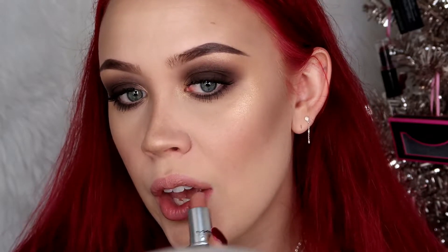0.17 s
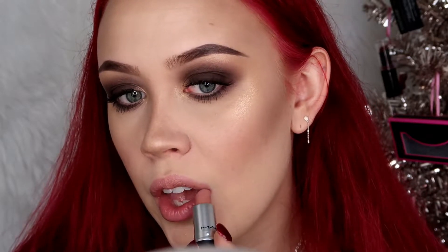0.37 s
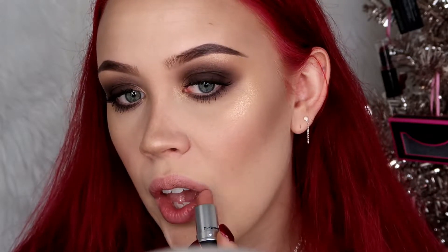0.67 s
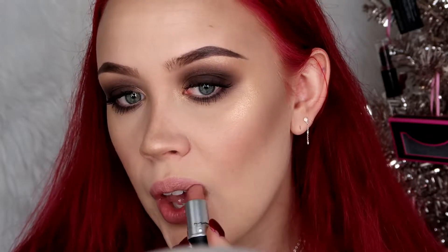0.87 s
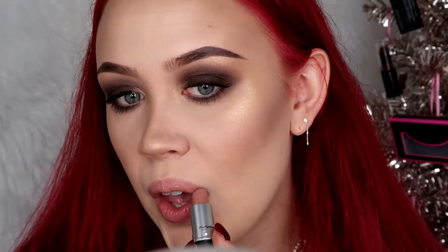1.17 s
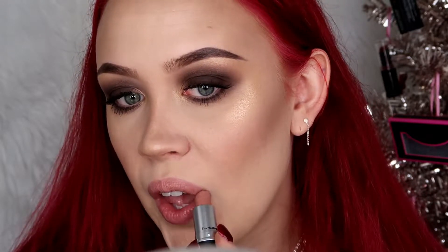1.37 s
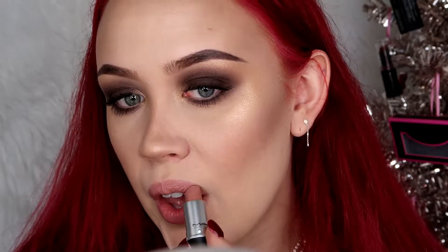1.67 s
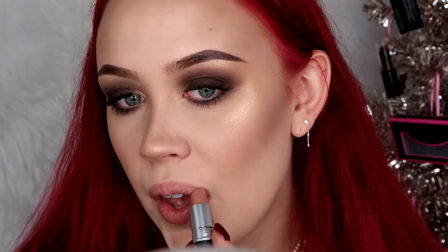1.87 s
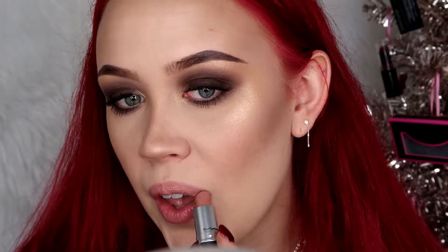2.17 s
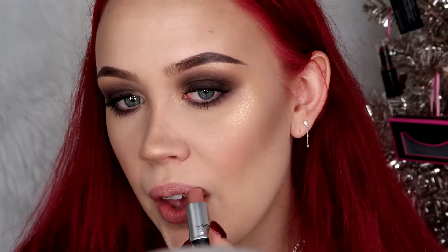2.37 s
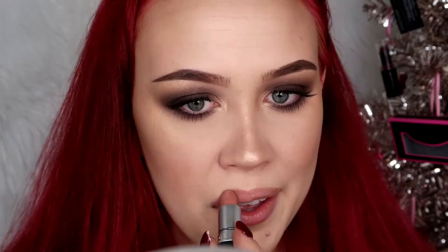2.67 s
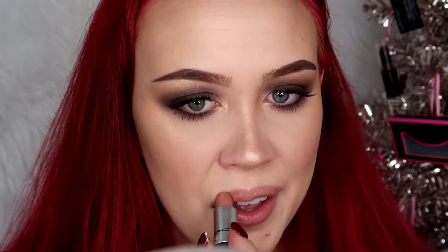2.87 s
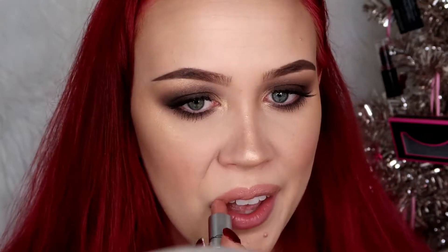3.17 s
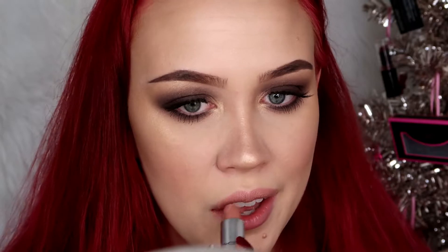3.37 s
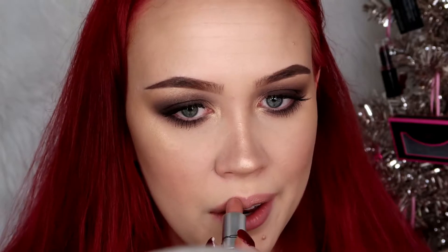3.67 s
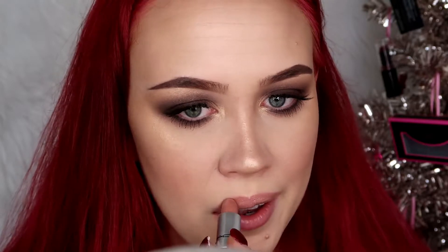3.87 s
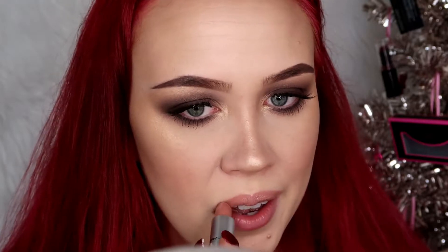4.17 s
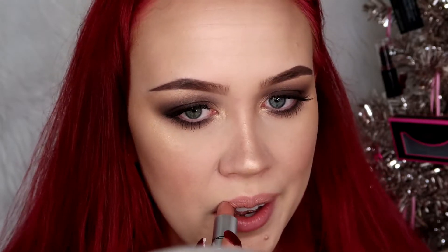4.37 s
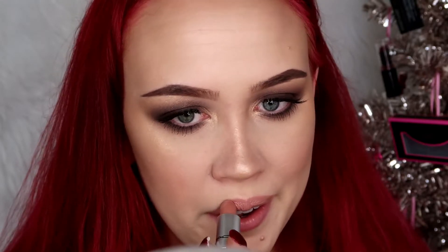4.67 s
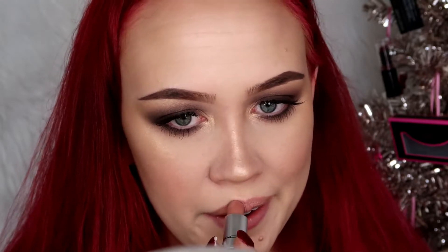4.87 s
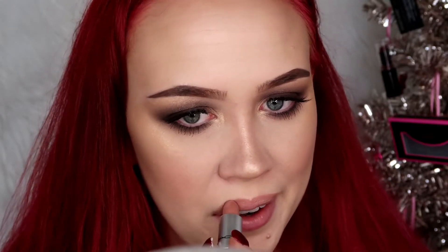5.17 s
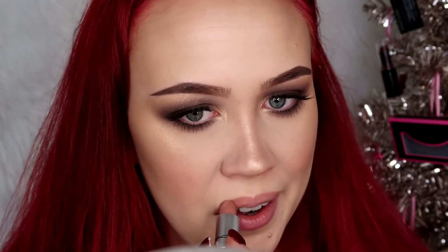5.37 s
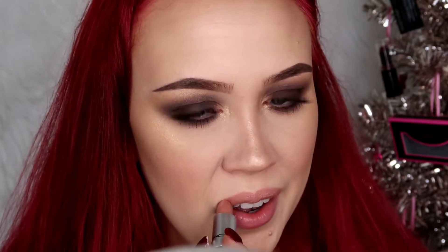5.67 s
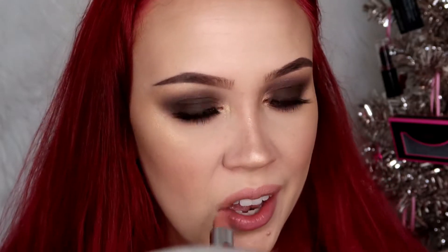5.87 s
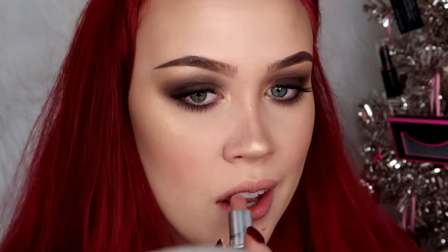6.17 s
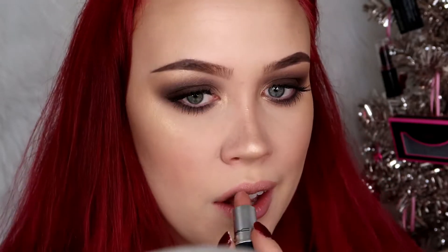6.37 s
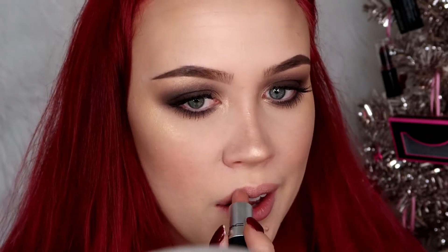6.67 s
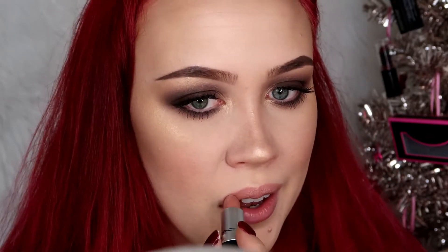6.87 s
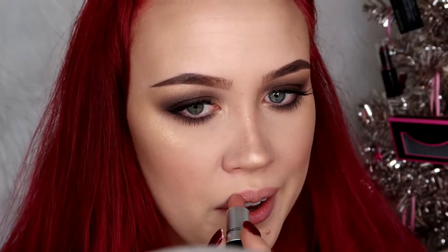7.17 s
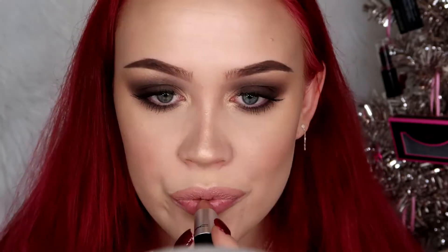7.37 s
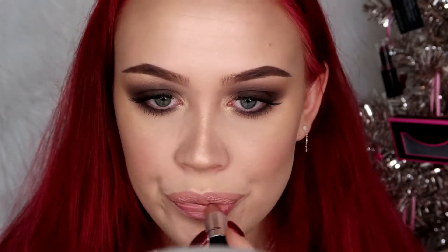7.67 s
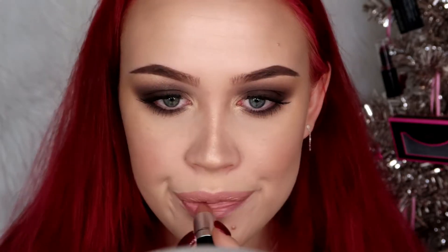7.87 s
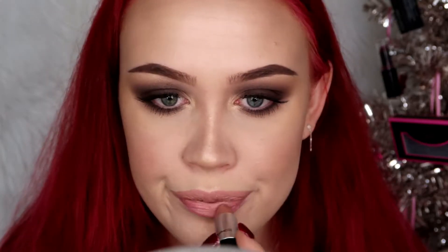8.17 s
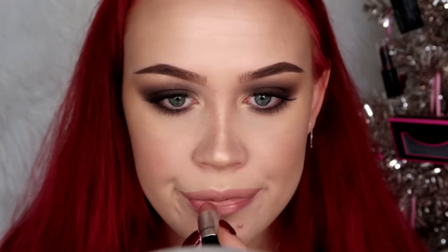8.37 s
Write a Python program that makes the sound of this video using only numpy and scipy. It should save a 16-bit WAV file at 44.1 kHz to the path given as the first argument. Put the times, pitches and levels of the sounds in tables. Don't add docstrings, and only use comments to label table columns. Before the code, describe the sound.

In a quiet room, a distant engine throbs low and unsteadily through the walls beside a slow pump, mains hum and hiss. A small thump at about 2.6 seconds brings a low compressor drone and clearer lens motor whir; a second near 7.3 seconds removes the compressor. Camera microphones pick up rapid faint ticking. Lipstick application makes no distinct sound.

```python
import sys
import numpy as np
from scipy import signal
from scipy.fft import rfft, irfft, next_fast_len
from scipy.io import wavfile
from scipy.ndimage import uniform_filter1d, map_coordinates

SR = 44100
rng = np.random.default_rng(int(sys.argv[2]) if len(sys.argv) > 2 else 0)


def volts(x):
    e = np.asarray(x, float) / 20
    return 10 ** e


def generate_wav(sig):
    pcm = np.round(np.clip(np.atleast_2d(sig).T, -1, 1) * 32767).astype(np.int16)
    wavfile.write(sys.argv[1], SR, pcm)


N = 375291
FRAME_HZ = 30000 / 1001

# start t/s, a frame mark t/s, waveform jump at the cut left, right [full scale 1]
TAKES = [
    (0, .0008, 0, 0),
    (2.60934, 2.6505, .017, .0135),
    (7.32932, 7.3455, -.013, -.006),
]
# t/s, level/dB
MAIN_ORDER_LEVEL = [(0, -44.5), (1.4, -41.5), (1.95, -41.5), (2.6, -51.5), (3, -50.5), (5.2, -56),
                    (6, -56.5), (7.6, -55), (8.51, -72)]
# multiple of the cycle rate, level/dB in the first, second, third take
OTHER_ORDERS = [(8, -3, -0.5, 3), (9, -0.5, -4.5, -9), (10, -8, -16, 2), (12, -6.5, -23, -4),
                (13, 1.5, -8, -1), (14, -10.5, -11, -3), (15, -14.5, -8.5, -9), (16, -20, -30, -14)]
# other orders level/dB at the start, drift/(dB/s), rumble level/dB
ENGINE_REST = [
    (-59, 5, -53.5),
    (-50.5, -1.44, -52),
    (-58, 0.5, -49.5),
]
# f/Hz, density level/dB
WALL_RUMBLE = [(12, -42), (19, -8.5), (45, -2), (62, -3), (100, 1), (125, -13), (150, -10), (220, -20.5),
               (450, -23.5), (700, -61)]
# time before the frame mark t/s, step size [full scale 1]
SUPPLY_STEPS = [(.0176, .0015), (.015, -.001), (.0086, -.0014), (.008, .002), (.0062, .0032),
                (.0009, -.0046), (-.0004, .0012), (-.002, -.002)]
# start t/s, end t/s, level/dB, drift/(dB/s)
MOTOR_BOUTS = [
    (1.9, 2.25, -75, -2),
    (2.615, 3.602, -65, 0),
    (6.15, 7.3, -67, 0),
    (7.33, 8.51, -66, 2),
]
# f/Hz, width/Hz, level/dB
SHELL = [(377, 88, 1.5), (678, 120, -1)]
# f/Hz, width/Hz, level/dB
BARREL = [(4500, 1800, -7.5)]
# f/Hz, width/Hz, level/dB
MOUNT = [(3780, 450, 0), (4250, 250, -5)]
# f/Hz, density level/dB
HISS = [(35, -54), (60, -19), (99, -20.5), (186, -0.5), (260, -1), (460, -1.5), (536, -5), (1660, -9),
        (2980, -13), (3820, -14.5), (7000, -22), (10000, -28), (12300, -33), (13200, -28.5)]
# t/s, length/s, f/Hz, level/dB
BUMPS = [(.33, .12, 167, -58), (.58, .06, 165, -59), (2.15, .1, 200, -60), (2.15, .08, 240, -62),
         (2.12, .1, 435, -61), (2.1, .15, 172, -63), (4.2, .1, 166, -58), (5.2, .08, 200, -62),
         (5.93, .13, 165, -57), (.75, .1, 109, -51), (7.85, .05, 97, -44), (7.58, .05, 80, -47),
         (8.4, .1, 83, -50)]


def unit(x):
    return x / np.sqrt(np.mean(x ** 2) + 1e-20)


def wobble(rate):
    knots = rng.standard_normal(int(N * rate / SR) + 4)
    return map_coordinates(knots, [np.arange(N) * rate / SR])


def eased(x):
    return uniform_filter1d(1. * x, size=400)


def filtered(x, response):
    m = next_fast_len(N + SR // 2)
    return irfft(rfft(x, m) * response(np.fft.rfftfreq(m, 1 / SR)), m)[..., :N]


def noise(spectrum, channels):
    f, db = np.transpose(spectrum)
    white = rng.standard_normal((channels, N))
    return unit(filtered(white, lambda hz: volts(np.interp(np.log(hz + 1), np.log(f), db))))


def resonant(modes):
    def response(f):
        total = 0
        for k, (centre, width, db) in enumerate(modes):
            damping = 1j * f * width
            total = total + (-1) ** k * volts(db) * damping / (centre * centre - f * f + damping)
        return total
    return response


def tone(hz, phase=None):
    if phase is None:
        phase = 2 * np.pi * rng.random()
    return np.sqrt(2) * np.sin(2 * np.pi * np.cumsum(hz * np.ones(N)) / SR + phase)


def take_index():
    return np.searchsorted([row[0] for row in TAKES], np.arange(N) / SR, side="right") - 1


def take_time():
    return np.arange(N) / SR - np.array([row[0] for row in TAKES])[take_index()]


def frame_phase():
    return (np.arange(N) / SR - np.array([row[1] for row in TAKES])[take_index()]) * FRAME_HZ


def once_a_frame(early_s):
    return np.flatnonzero(np.diff(np.floor(frame_phase() + early_s * FRAME_HZ)) == 1)


def engine():
    take, since_cut = take_index(), take_time()
    cycle_hz = np.array([9.045, 8.945, 8.86])[take] - .014 * since_cut
    main_db = np.interp(np.arange(N) / SR, *np.transpose(MAIN_ORDER_LEVEL))
    start_db, drift_db, rumble_db = np.transpose(ENGINE_REST)[:, take]
    other_db = start_db + drift_db * since_cut
    out = volts(main_db + 1.2 * wobble(4)) * tone(11 * cycle_hz)
    for order, *db in OTHER_ORDERS:
        order_db = eased(other_db + np.array(db)[take]) + 1.76 * wobble(3.04)
        out += volts(order_db) * tone(order * cycle_hz)
    return out + volts(eased(rumble_db) + 1.1 * wobble(4)) * noise(WALL_RUMBLE, channels=1)[0]


def pump():
    db = -50.5 - 1.2 * np.arange(N) / SR + 3.3 * wobble(3.5)
    return eased(take_index() == 0) * volts(db) * tone(30.9 + 0.076 * wobble(1.8))


def compressor():
    t = np.arange(N) / SR
    unload_s, strain_s, strain_lasts_s = 6.45, 5.85, .18
    unloading = (1 + np.tanh((t - unload_s) / .12)) / 2
    octave_hz = 107.05 + .53 * take_time() + 1.8 * unloading
    octave_db = -49 - 11 * np.maximum(t - unload_s, 0)
    octave_db += 3.5 * np.exp(-((t - strain_s) / strain_lasts_s) ** 2)
    octave_db -= 2.5 * eased(t > strain_s + strain_lasts_s)
    from_peak_s = t - 5.5
    low_db = -54 - np.maximum(-from_peak_s, 5 * from_peak_s)
    low = volts(low_db + 1.2 * wobble(4.9)) * tone(octave_hz / 2)
    octave = volts(octave_db + 2.15 * wobble(7)) * tone(octave_hz)
    return eased(take_index() == 1) * (low + octave)


def mains_and_fan():
    mains_hz = 59.94
    hum = volts(-61) * tone(mains_hz) + volts(-69 + 2.7 * wobble(3)) * tone(3 * mains_hz)
    return hum + volts(-61 + 2.5 * wobble(2.5)) * tone(19.3)


def supply():
    edges = np.zeros(N)
    for early_s, size in SUPPLY_STEPS:
        edges[once_a_frame(early_s)] += size

    def edge_response(f):
        low_cut = 1j * f * SR / (2 * np.pi) / (230 ** 2 - f * f + 1j * f * 170)
        return low_cut / (1 + 1j * f / 2500)
    return filtered(edges, edge_response)


def motor_effort():
    t = np.arange(N) / SR
    held = []
    for start, end, db, drift_db in MOTOR_BOUTS:
        outside_s = np.maximum(start - t, 0) + np.maximum(t - end, 0)
        held.append(db + drift_db * (t - start) - 65 * outside_s)
    return np.maximum(np.max(held, axis=0), -78.5)


def motor_whir(effort_db):
    shell = resonant(SHELL)
    whir = unit(filtered(rng.standard_normal(N), lambda f: shell(f) ** 2))
    return volts(effort_db + 1.5 + 2.4 * wobble(8)) * whir


def motor_rattle(effort_db):
    kicks = np.zeros(N)
    for early_s, db in [(-0.00055, 7), (-0.035, -11)]:
        steps = once_a_frame(early_s)
        kicks[steps] = volts(db + 1.5 * rng.standard_normal(len(steps)))
    t = np.arange(SR // 50) / SR
    bursts = signal.fftconvolve(kicks, t / .0012 * np.exp(-t / 0.00096))[:N] + 0.045
    barrel, mount = resonant(BARREL), resonant(MOUNT)
    rough = bursts * rng.standard_normal((2, N))
    alike, opposite = filtered(rough, lambda f: np.array([barrel(f), mount(f)]) ** 2)
    return volts(effort_db - 1.0) * unit(np.array([alike + opposite, alike - opposite]))


def whine():
    gate = np.clip(.75 - np.cos(2 * np.pi * (frame_phase() + .085)), .25, 1.25)
    hz = 13006.5 + 1.5 * wobble(2.4)
    return volts(-74) * gate * np.array([tone(hz, phase=1.2), tone(hz, phase=-1.2)])


def microphone_hiss():
    hiss = volts(-53 + wobble(3.64) / 5) * noise(HISS, channels=2)
    return hiss - filtered(hiss[::-1], lambda hz: .08 / (1 + (hz / 3000) ** 4))


def bumps():
    t = np.arange(N) / SR
    return sum(volts(db) * np.exp(-((t - s) / length) ** 2) * tone(hz) for s, length, hz, db in BUMPS)


def cuts():
    out, t = np.zeros((2, N)), np.arange(SR // 20) / SR
    swing = np.exp(-t / .0035) * np.cos(2 * np.pi * 90 * t)
    for s, _, *jump in TAKES[1:]:
        start = round(s * SR)
        out[:, start:start + len(t)] += np.outer(jump, .55 * swing)
        out[:, start - len(t):start] -= np.outer(jump, .45 * swing[::-1])
    return out


def scene():
    effort_db = motor_effort()
    room = engine() + pump() + compressor() + mains_and_fan() + bumps()
    camera = supply() + motor_whir(effort_db) + motor_rattle(effort_db) + whine() + microphone_hiss()
    return filtered(room + camera, lambda hz: hz < 13120) + cuts()


def low_pass(x):
    return signal.sosfilt(signal.butter(12, 15800, fs=SR, output="sos"), x)


def record(dry):
    return low_pass(dry + .00043)


dry = scene()
out = record(dry)
generate_wav(out)
```